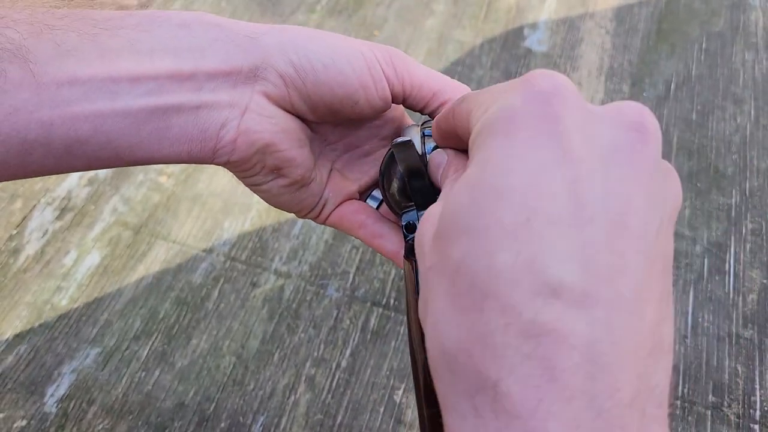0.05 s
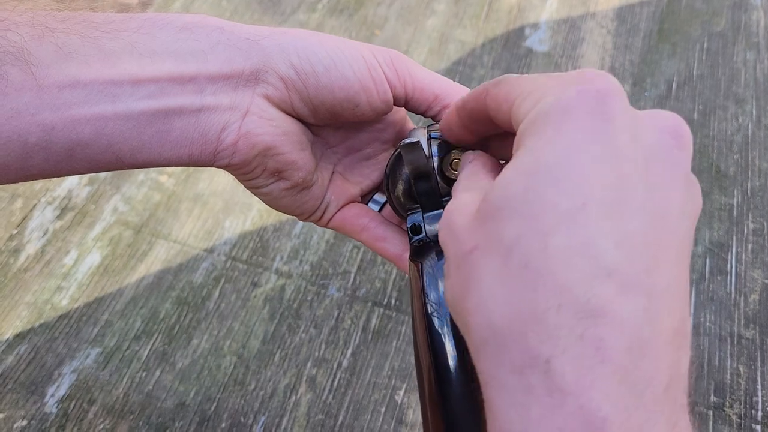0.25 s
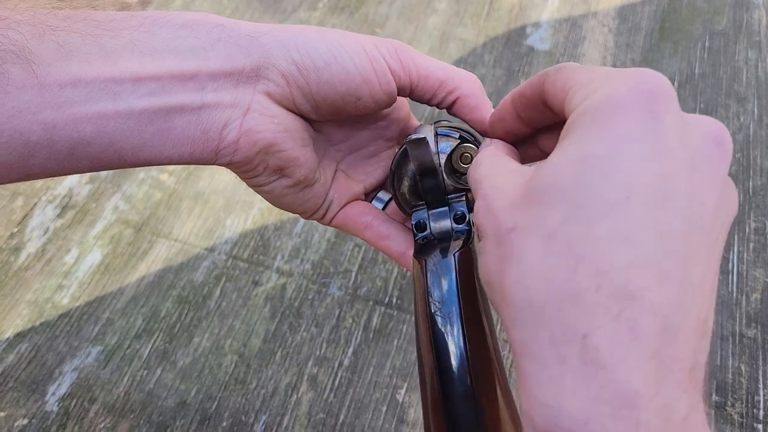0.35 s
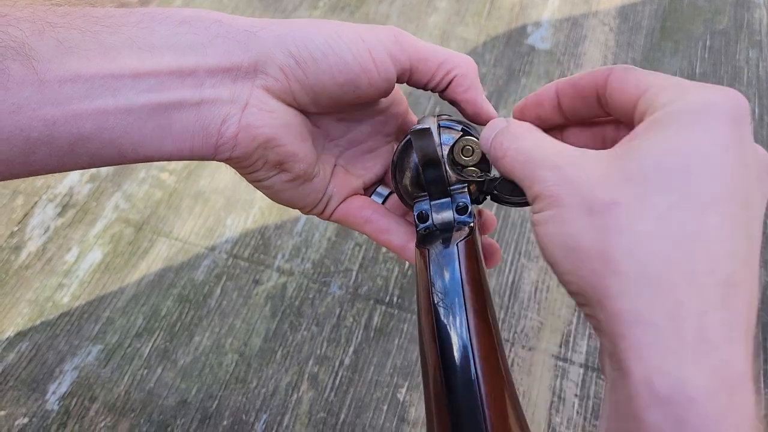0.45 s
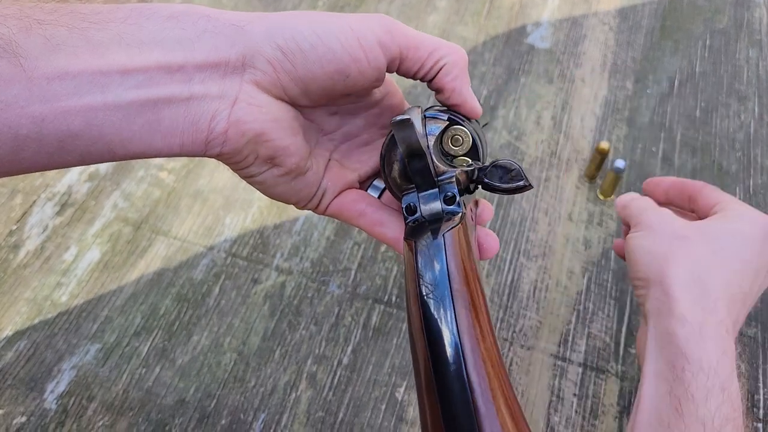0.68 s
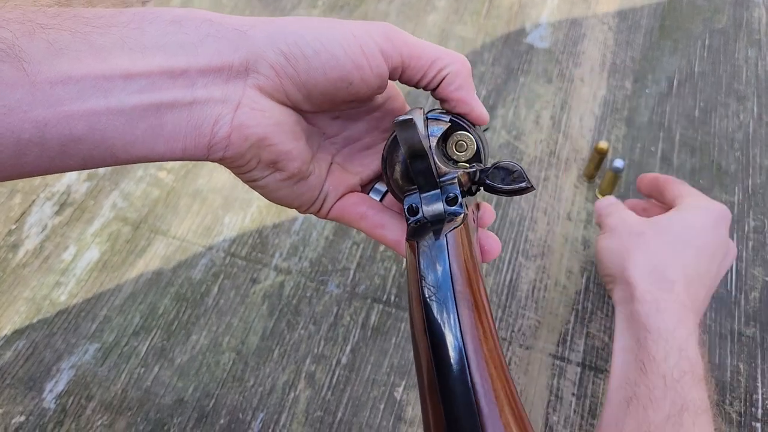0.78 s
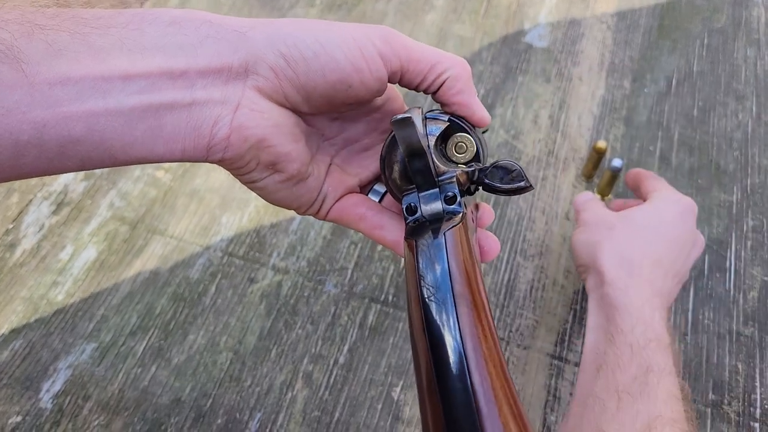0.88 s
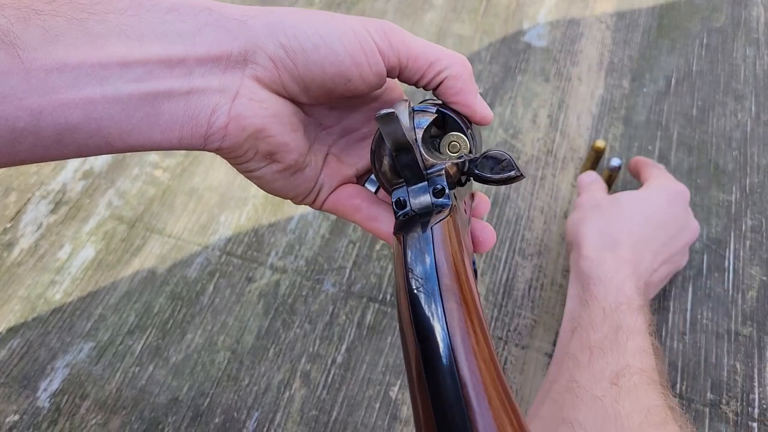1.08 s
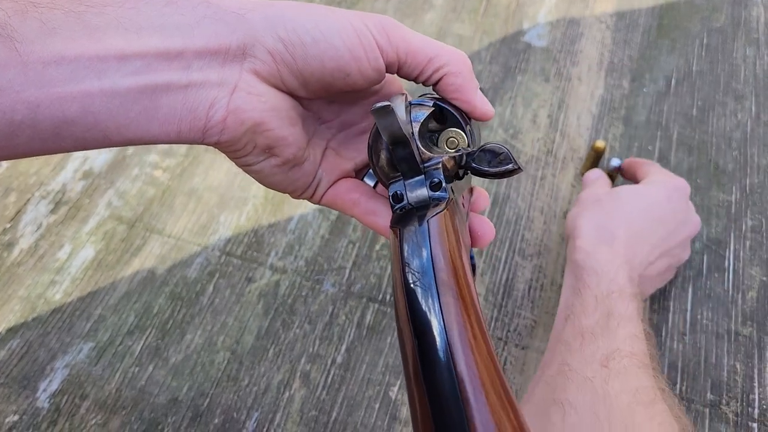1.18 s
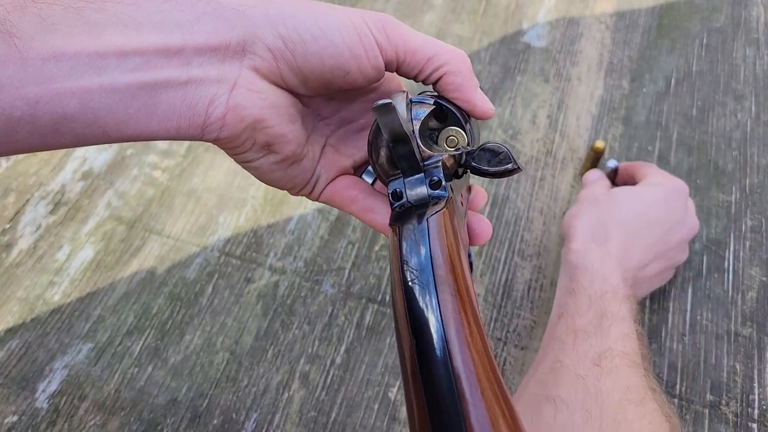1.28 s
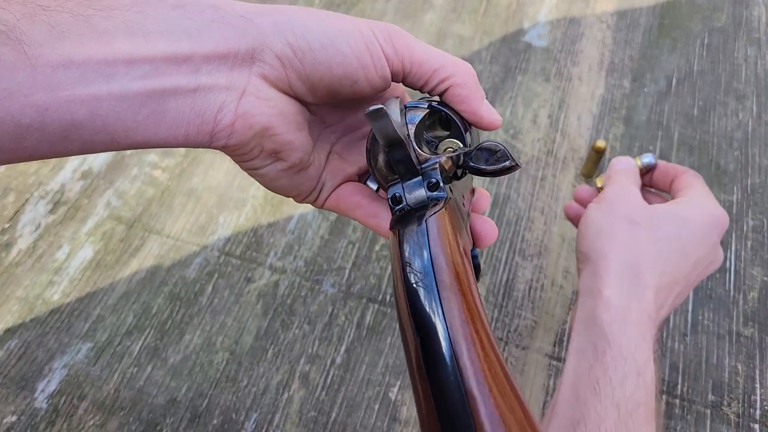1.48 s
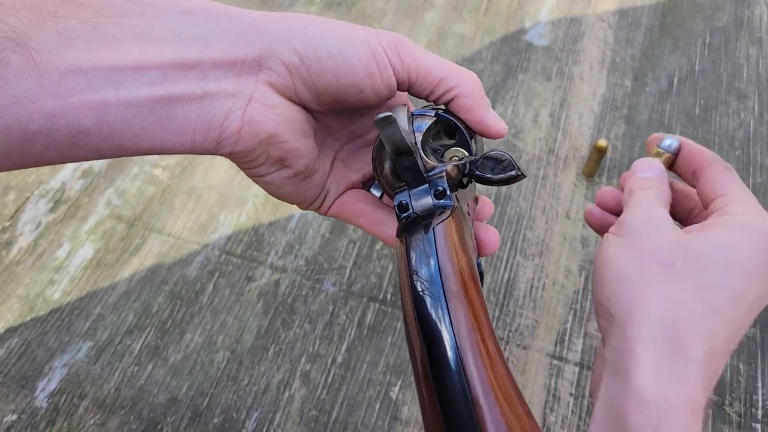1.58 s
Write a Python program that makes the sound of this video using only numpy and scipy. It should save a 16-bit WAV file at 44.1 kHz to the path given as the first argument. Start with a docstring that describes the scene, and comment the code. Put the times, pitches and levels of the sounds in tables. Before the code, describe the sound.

Revolver being loaded by hand: soft metal knocks and short rubs, a brass cartridge ringing as it seats, a sharp cylinder click, then faint taps on a wooden bench, close stereo microphone outdoors with light wind.

```python
"""First a soft metal knock is heard over light wind on the microphones and a distant outdoor wash.
More knocks and short rubs follow as a brass cartridge slides into a revolver chamber and rattles home;
each knock makes steel and brass ring, and each rub is a dense run of tiny clicks through the metal.
A soft thump on a wooden bench comes next, then a sharp snap as the cylinder turns one notch.
Last, fingers pick the next cartridge off the bench: light wooden taps with a clink, and one more thump."""
import sys
import numpy as np
from scipy import signal
from scipy.io import wavfile
from scipy.ndimage import uniform_filter1d

SR = 44100
rng = np.random.default_rng(int(sys.argv[2]) if len(sys.argv) > 2 else 0)


def dump_mix(stems):
    """Bounce the given channels to the path in sys.argv[1] as a 16-bit WAV at rate SR."""
    frames = np.atleast_2d(stems).T  # one column per channel
    limited = np.clip(frames, -1, 1)  # hard clip at full scale
    pcm = np.round(limited * 32767).astype(np.int16)
    wavfile.write(sys.argv[1], SR, pcm)


N = 72765  # length in samples, 1.65 s

GUN_LAG_MS = 0.5014  # the right microphone hears the gun later
REST_T60 = 0.18  # s, fade of what is left of a ring after the touch
BASS_HOLD, FALL = 0.11, 1.05  # low modes are damped later; shape of the fall
TICK_T60, TICK_LOW_HZ, TICK_HIGH_HZ = 0.01, 3680, 14800  # s, Hz, Hz


def gain_of(db):
    """Turns decibels into a plain multiplier."""
    return 10 ** (np.asarray(db) / 20)


def evened(x):
    """Scales a signal to an average (RMS) strength of one."""
    return x / np.sqrt(np.mean(x ** 2) + 1e-20)


def read(points, hz):
    """Reads a curve between its points, along a logarithmic pitch scale."""
    f, value = np.transpose(points)
    return np.interp(np.log(hz + 1), np.log(f + 1), value)


def add(mix, s, sound):
    """Adds a sound to the mix at time s, cut off at the end of the scene."""
    part = mix[:, round(s * SR):][:, :sound.shape[1]]
    part += sound[:, :part.shape[1]]


def shape(t, rise_ms, t60):
    """Soft rise, then exponential decay that loses 60 dB in t60 seconds."""
    t = np.maximum(t, 0)
    rise = 1 - np.exp(-(t * 1000 / max(rise_ms, 0.05)) ** 2)
    return rise * gain_of(-60 * t / t60)


def ring(modes, rise_ms, free_ms=60.0, rest_db=0.0, lag_ms=0.0, detune=0.0):
    """Struck modes at both microphones: each rings freely, then a touch damps it to a small rest."""
    t = np.arange(SR // 6) / SR
    out = np.zeros((2, len(t)))
    chances = rng.random((len(modes), 2))
    for (hz, db, t60, side_db), (phase, shift) in zip(modes, chances):
        f = hz * (1 + detune * (2 * shift - 1))
        for ch in (0, 1):  # left, right
            u = t - ch * lag_ms / 1000
            # free_ms holds at 5000 Hz, where BASS_HOLD changes nothing
            progress = np.maximum(u, 0) * 1000 / free_ms * (hz / 5000) ** BASS_HOLD
            rest = gain_of(rest_db - 60 * u / REST_T60)
            touch = np.maximum(1 - progress ** FALL, rest)
            tone = np.sin(2 * np.pi * (f * u + phase))
            out[ch] += gain_of(db - ch * side_db) * touch * shape(u, rise_ms, t60) * tone
    return out


def tick(rise_ms, t60, side_db):
    """Wide scrape of metal on metal at contact: a short burst of band-passed noise."""
    t = np.arange(SR // 6) / SR
    band = signal.butter(4, [TICK_LOW_HZ, TICK_HIGH_HZ], "bandpass", fs=SR, output="sos")
    hiss = evened(signal.sosfilt(band, rng.standard_normal((2, len(t)))))
    return hiss * shape(t, rise_ms, t60) * gain_of([[0], [-side_db]])


# how far the left side leads in the air noise: (f/Hz, phase lead/rad)
LEFT_LEAD = [(0, -0.5), (1030, 2.5), (2330, 4.02), (4220, 5.5), (4820, 4.5), (5340, 11), (8350, 5),
             (9390, 2.5), (10400, 8.5), (11800, 19.5), (13000, 24), (14000, 26), (15000, 27), (16700, 25)]


def noise_pair(spectrum, same, side_db, patchy_db, size):
    """Two-channel noise from random short-time spectra with drifting louder and softer patches."""
    frames, hz = N // (size // 4) + 5, np.fft.rfftfreq(size, 1 / SR)
    a, b, c, d, patches = rng.standard_normal((frames, len(hz), 5)).T
    patches = uniform_filter1d(patches, size=10, axis=0)
    patches = evened(uniform_filter1d(patches, size=8, axis=1))
    same = np.clip(same(hz), -1, 1)[:, None]
    left = a + 1j * b
    delay = np.exp(-1j * np.interp(hz, *np.transpose(LEFT_LEAD)))[:, None]
    # the right side mixes the delayed left side with noise of its own
    right = same * delay * left + np.sqrt(1 - same ** 2) * (c + 1j * d)
    z = np.array([left, right])
    z *= gain_of(read(spectrum, hz)[:, None] + patchy_db * patches)
    z *= gain_of(np.array([0.5, -0.5])[:, None, None] * side_db(hz)[None, :, None])
    x = signal.istft(z, nperseg=size, noverlap=size * 3 // 4)[1][:, :N]
    return x / np.sqrt(np.mean(x.mean(0) ** 2))


# tone colour of the distant air: (f/Hz, relative level per Hz/dB)
AIR_SPECTRUM = [(65, -33.5), (110, -1), (197, -15.5), (274, -5), (317, -9), (407, -6.5), (451, -13.5),
                (501, -7), (603, -12), (669, -9.5), (758, -10), (807, -15.5), (877, -12.5), (1170, -16),
                (1330, -15), (1740, -17.5), (2050, -17.5), (2800, -19), (4910, -38), (8250, -57.5),
                (12500, -39.5), (15700, -43)]
# how alike left and right are: (f/Hz, likeness from 0 to 1)
AIR_LIKENESS = [(30, .5), (100, .6), (200, 0.89), (500, 0.4), (1200, 0.65), (2500, 0.18), (4500, 0.31),
                (8000, .05)]
# balance of the air: (f/Hz, left minus right/dB)
AIR_BALANCE = [(60, -12), (130, 0.0), (290, -5), (640, -2), (1410, -8.5), (3100, -2), (6820, 9),
               (15000, -0.5)]
WASH_DB = -56.5


def wash():
    """Distant outdoor air as shaped noise, with the microphone's thin hiss on top."""
    spectrum = list(AIR_SPECTRUM) + [(16100, -77)]
    air = noise_pair(spectrum, lambda f: read(AIR_LIKENESS, f), lambda f: read(AIR_BALANCE, f),
                     patchy_db=2.0, size=1024)
    return gain_of(WASH_DB) * air


# wind swelling and dropping: (t/s, level/dB, left minus right/dB)
GUSTS = [(0.0, -50.5, 9), (0.058, -56, -11), (0.09, -51.5, 0), (0.142, -51.5, -5), (0.188, -56.5, 9.5),
         (0.228, -60, -6), (0.252, -49.5, 0.5), (0.344, -59.5, -4), (0.38, -45, 9), (0.418, -57.5, 7),
         (0.44, -49.5, 15), (0.55, -56, 0), (0.62, -54.5, 7.0), (0.694, -46, 11), (0.734, -53, 10),
         (0.758, -49, 3.5), (0.794, -47, 15), (0.83, -53, 1.5), (0.96, -49, 8), (1.0, -57, -4),
         (1.034, -54.5, -2.5), (1.07, -54, 3), (1.23, -51, -5.5), (1.24, -62, -9), (1.3, -46, 0),
         (1.342, -56.5, -6), (1.47, -48.5, 1.5), (1.512, -58, -7), (1.626, -51, -2.5), (1.65, -61, 9)]
# tone colour of the wind: (f/Hz, relative level per Hz/dB)
WIND_SPECTRUM = [(8.8, -52), (15, -11.5), (70, 11), (88, 8), (124, -7.5), (200, -8), (260, -50.5),
                 (440, -120)]
WIND_SAME = 0.5  # left-right likeness


def wind():
    """Lumpy low rumble of wind on the microphones, partly unrelated at the two ports."""
    s, db, side_db = np.transpose(GUSTS)
    t = np.arange(N) / SR
    x = noise_pair(WIND_SPECTRUM, lambda f: WIND_SAME + 0 * f, lambda f: 0 * f,
                   patchy_db=-0.5, size=4096)
    # level out the noise's own swells so that the gusts set the loudness
    x = x / np.sqrt(uniform_filter1d(x ** 2, size=1800, axis=1) + 0.071)
    balance = np.array([[0.5], [-0.5]]) * np.interp(t, s, side_db)
    return x * gain_of(np.interp(t, s, db) + balance)


# cartridge knocking against the chamber: (t/s, steel level/dB, added to its middle modes/dB,
# added to its upper modes/dB, brass level/dB, free ring of the brass/ms, tick level/dB, rise/ms)
CHAMBER_KNOCKS = [(.0056, -36.5, -11, -26, -77, 5.7, -79, 2.1), (0.1089, -49.5, -4, -13, -85, 8, -82, 0.64),
                  (.2160, -39.5, 0, 12.5, -16.5, 37.7, -25.5, 0.65),
                  (0.2218, -43.5, -13, 12.5, -60, 8, -60.5, 1.0), (0.2315, -40.5, -10, 3, -65, 8, -41, 1.4),
                  (0.2466, -39, 2, -16, -61, 11, -56, 0.33), (0.2492, -38.5, 4, -1, -70, 5.6, -58.5, 1.25),
                  (0.2997, -70, -16, 3, -67, 8, -51, 0.88), (0.3144, -47, 1.5, 3.5, -33, 11, -46.5, 0.51),
                  (0.3862, -23, 2, 0.5, -37, 16.6, -33.5, 0.68),
                  (0.4223, -38, -6, -3.5, -55.5, 13.5, -52, 0.48)]
# steel frame and cylinder: (f/Hz, level/dB, t60/s, left minus right/dB)
STEEL_MODES = [(521, -20.5, .06, -4), (1318, -12, 0.026, -1.5), (2493, 5.5, 0.027, 1.5), (2790, -4, .04, 6),
               (3130, 4, .025, 13.5), (3433, -10.5, 0.017, -5.5), (4100, -11, 0.0264, 6),
               (4446, -8, 0.036, 8.5), (4960, -14.5, 0.029, 8.5), (6660, -41.5, 0.018, 8.5),
               (8000, -20, 0.048, 9), (9600, -21.5, .02, 8)]
# pitches of the brass case: (f/Hz)
CASE_HZ = [11272, 11310, 11850, 12720, 13900]
# brass case, one row for each of those pitches: (level/dB, t60/s, left minus right/dB)
CASE_MODES = [(2, 0.45, 10.5), (-16, .15, 9), (-28.5, .05, -4), (-15, .12, 0.5), (-38, 0.032, -2.5)]
MIDDLE_HZ, UPPER_HZ = 2800, 3900  # middle and upper steel modes lie above these
STEEL_FREE_MS, STEEL_REST_DB, BRASS_REST_DB = 12.7, -16, -19
BRASS_SLOWER, BRASS_LAG_MS = 2, 1.169  # the case swells more slowly; later on the right
DETUNE = 0.005  # random shift of each steel mode's pitch per knock, up to this share either way


def loading(mix):
    """Each knock rings the steel and the brass case at their own pitches, with a short tick."""
    brass = [(hz, *row) for hz, row in zip(CASE_HZ, CASE_MODES)]
    for s, steel_db, mid_db, up_db, brass_db, free_ms, tick_db, rise_ms in CHAMBER_KNOCKS:
        steel = []
        for hz, db, t60, side_db in STEEL_MODES:
            extra_db = up_db if hz > UPPER_HZ else mid_db if hz > MIDDLE_HZ else 0
            steel.append((hz, db + extra_db, t60, side_db))
        steel_ring = ring(steel, rise_ms, STEEL_FREE_MS, STEEL_REST_DB, GUN_LAG_MS, DETUNE)
        brass_ring = ring(brass, BRASS_SLOWER * rise_ms, free_ms, BRASS_REST_DB, BRASS_LAG_MS)
        contact = tick(rise_ms, TICK_T60, side_db=8)
        add(mix, s, gain_of(steel_db) * steel_ring + gain_of(brass_db) * brass_ring
            + gain_of(tick_db) * contact)


# metal rubbing on metal: (t/s, length/s, level/dB, part: 0 steel frame or 1 pawl)
METAL_RUBS = [(0.202, 0.036, -48, 0), (.217, 0.058, -53.5, 0), (0.3903, 0.041, -45, 0),
              (0.851, 0.057, -47.5, 1)]
RUB_FADE_DB, RUB_TILT_DB = -10, -4  # over one rub; per octave, soft grit rings less treble
GRITS_PER_S, GRIT_SPREAD_DB = 4500, 4.0  # average click rate; how unequal the clicks are


def rubbing(mix):
    """Dense tiny random clicks, each setting the same metal parts ringing very briefly."""
    for s, length, db, part in METAL_RUBS:
        t = np.arange(SR // 15) / SR
        hit, size, sign = rng.random((len(t), 3)).T
        strength = gain_of(-GRIT_SPREAD_DB * np.log(size + 1e-3))
        grit = (hit < GRITS_PER_S / SR) * strength * np.sign(sign - 0.5)
        metal = PAWL_MODES if part > 0.5 else STEEL_MODES
        modes = [(hz, d + RUB_TILT_DB * np.log2(hz / 2500), *rest) for hz, d, *rest in metal]
        body = ring(modes, 0.25, free_ms=2.4, rest_db=-39, lag_ms=GUN_LAG_MS)[:, :SR // 40]
        body = body / np.linalg.norm(body[0])
        swell = np.sin(np.pi * np.clip(t / length, 0, 1) ** 0.44) * gain_of(RUB_FADE_DB * t / length)
        rub = signal.fftconvolve((evened(grit) * swell)[None], body, axes=1)
        add(mix, s, gain_of(db) * rub)


# soft hand thumps on the bench: (t/s, level/dB, f/Hz, t60/s)
HAND_THUMPS = [(1.357, -37, 261.5, 0.063), (0.6, -51, 300, 0.055)]


def thumps(mix):
    """A soft hand on the bench: one low mode that swells gently and dies away."""
    for s, db, hz, t60 in HAND_THUMPS:
        add(mix, s, gain_of(db) * ring([(hz, 0, t60, -2.0)], 1.4))


# pawl snapping into a notch of the cylinder, then settling: (t/s, level/dB, rise/ms, free ring/ms)
PAWL_SNAPS = [(0.8427, -1.5, 1.03, 4.8), (.8478, -27, .6, 3.4), (0.8819, -42, .6, 4.15)]
# what the snap rings: (f/Hz, level/dB, t60/s, left minus right/dB)
PAWL_MODES = [(980, -31, .03, -9), (1493, -30, 0.021, -6), (2500, -7, 0.036, 5), (2993, -10, 0.09, 5.5),
              (3450, -16.5, 0.039, 9.5), (4010, -17, 0.02016, 12.5), (4500, -30.5, 0.016, 17),
              (5080, -3, 0.0071, 19), (5650, -18.5, 0.016, 14), (5880, -12.5, 0.026, 20),
              (7780, -34.5, .02, 15), (8500, -1.5, .03, 25), (9026, -8.5, 0.033, 13),
              (10000, -11.5, 0.017, 14.5), (10560, -19, .02, 10), (11578, -19, 0.01, 1.5),
              (14100, -10.5, .02, 19), (14450, -11, 0.0195, 8.5), (15500, -26, 0.013, 10)]
PAWL_REST_DB = -24
SNAP_TICK_DB, SNAP_TICK_T60 = -6, 0.012  # dB against the snap, s
SCATTER_DB, SCATTER_T60 = -46, 0.14  # dB against the snap, s


def ratchet(mix):
    """The pawl snaps home and is soon damped; hands and bench throw back a diffuse hiss."""
    for s, db, rise_ms, free_ms in PAWL_SNAPS:
        snap = ring(PAWL_MODES, rise_ms, free_ms, PAWL_REST_DB, GUN_LAG_MS)
        contact = gain_of(SNAP_TICK_DB) * tick(rise_ms, SNAP_TICK_T60, side_db=13.5)
        scatter = gain_of(SCATTER_DB) * tick(7.3, SCATTER_T60, side_db=6)
        add(mix, s, gain_of(db) * (snap + contact + scatter))


# cartridges and fingers touching the bench:
# (t/s, level/dB, brass clink level against the touch/dB, left minus right/dB)
BENCH_TOUCHES = [(1.0131, -52.5, -32, -7.5), (1.0619, -48.5, -11.5, 8), (1.0999, -51.5, -33, -8.5),
                 (1.136, -48.5, -17, 8.5), (1.1731, -53, -23, 13), (1.205, -52.5, -27.5, 8),
                 (1.503, -57, -26, -5)]
# bench board: (f/Hz, level/dB, t60/s)
BOARD_MODES = [(716, -1.5, 0.045), (1210, -4.5, 0.051), (1736, -6.5, 0.061), (2290, 4.5, 0.0083),
               (3420, -8, 0.012), (4500, -17, 0.014)]


def bench(mix):
    """Light taps ring the board's wooden modes, with a noisy clink of brass."""
    for s, db, clink_db, side_db in BENCH_TOUCHES:
        wood = ring([(*row, side_db) for row in BOARD_MODES], 0.3, detune=0.055)
        clink = gain_of(clink_db) * tick(0.96, TICK_T60, side_db)
        add(mix, s, gain_of(db) * (wood + clink))


def scene():
    """Lays the handling sounds over the wash and the wind."""
    mix = wash() + wind()
    for source in (loading, rubbing, thumps, ratchet, bench):
        source(mix)
    return mix


EDGE_HZ = 17050  # upper limit of the sound


def record(dry):
    """A steep low-pass filter takes away the topmost treble."""
    low_pass = signal.firwin(511, EDGE_HZ, window=("kaiser", 9), fs=SR)
    return signal.oaconvolve(dry, low_pass[None], "same")


dry = scene()
out = record(dry)
dump_mix(out)
```